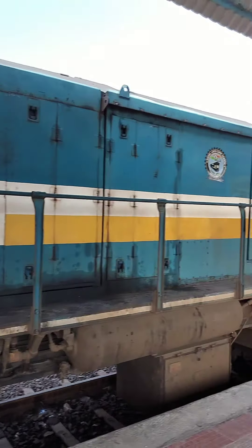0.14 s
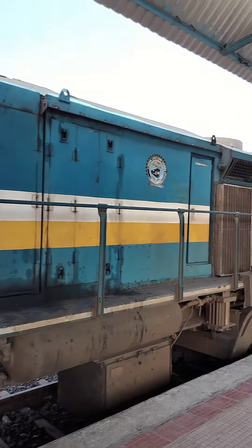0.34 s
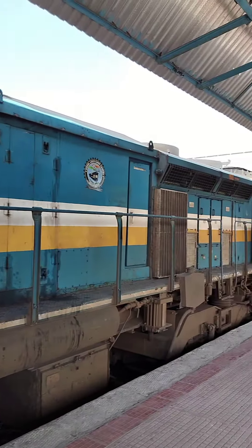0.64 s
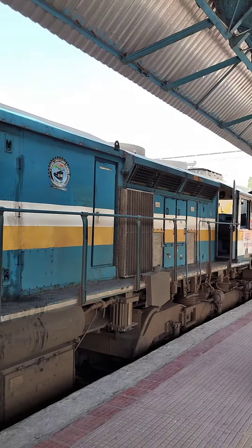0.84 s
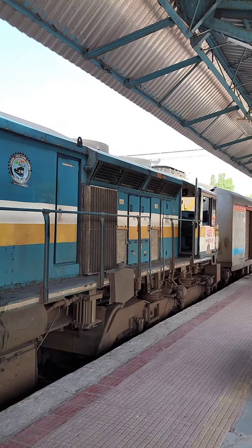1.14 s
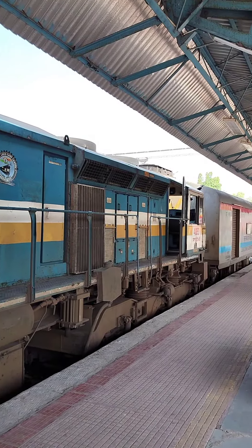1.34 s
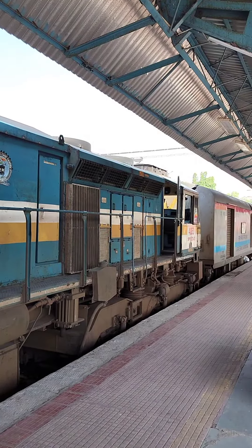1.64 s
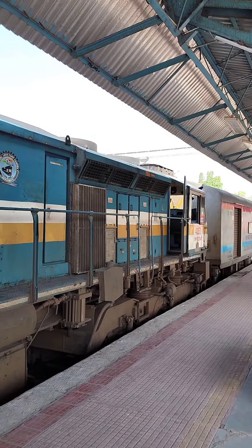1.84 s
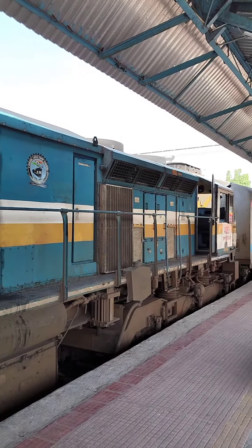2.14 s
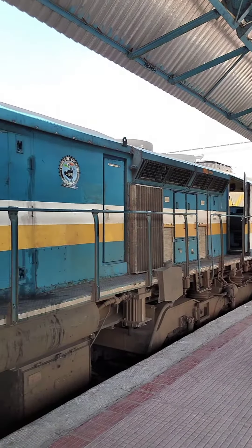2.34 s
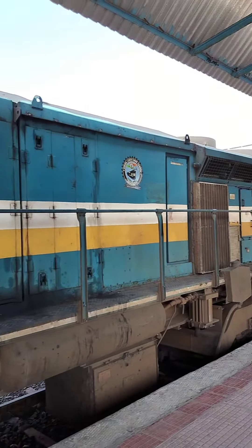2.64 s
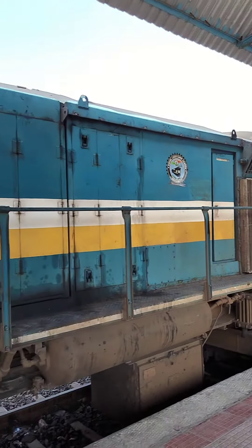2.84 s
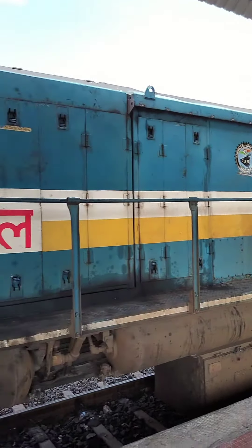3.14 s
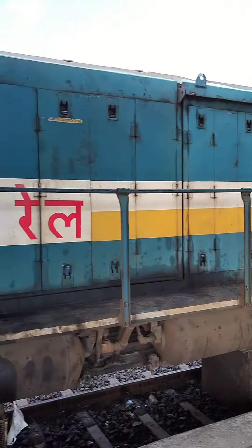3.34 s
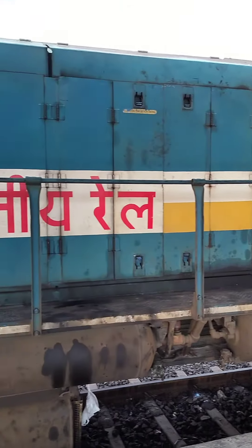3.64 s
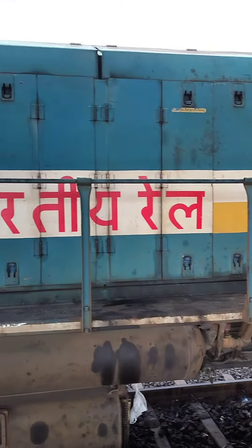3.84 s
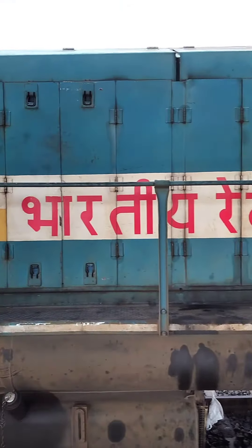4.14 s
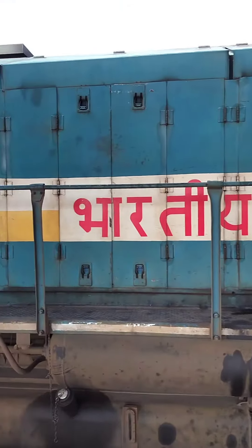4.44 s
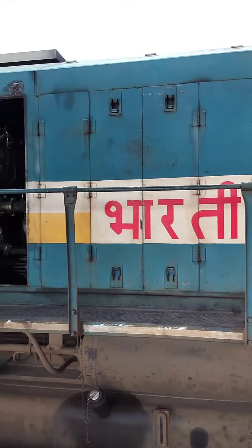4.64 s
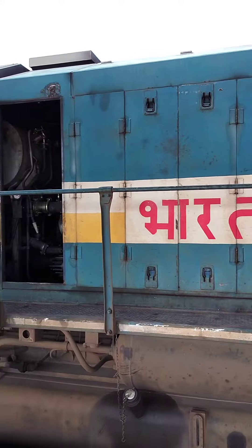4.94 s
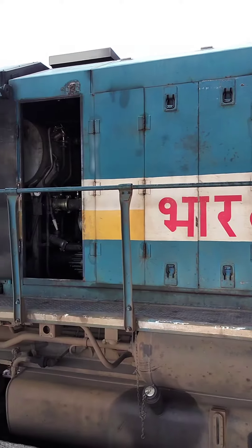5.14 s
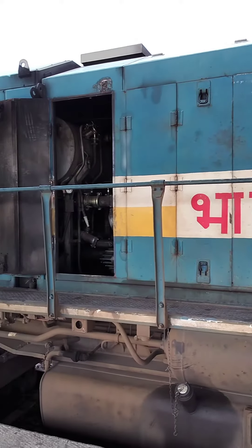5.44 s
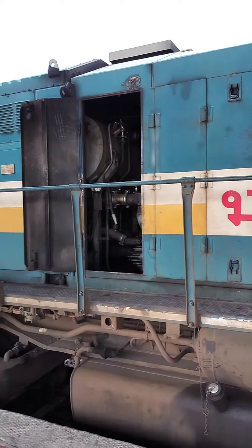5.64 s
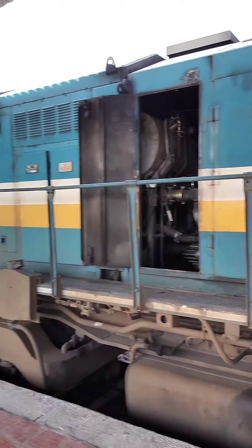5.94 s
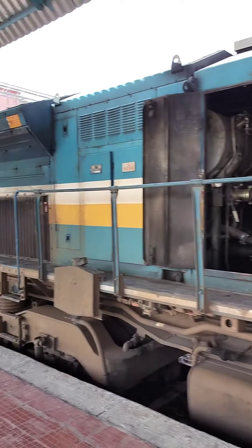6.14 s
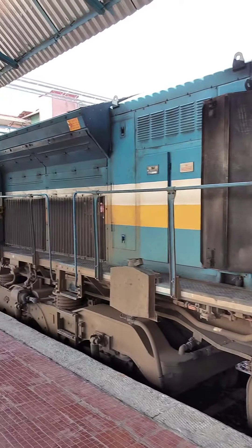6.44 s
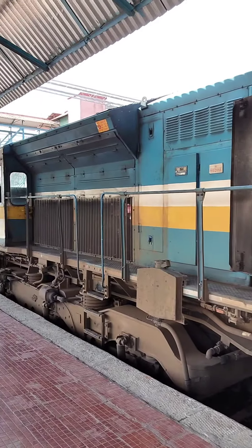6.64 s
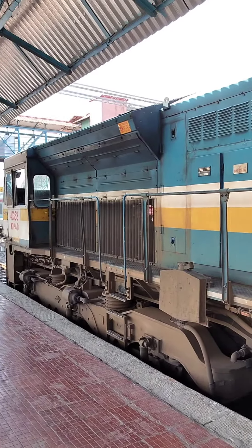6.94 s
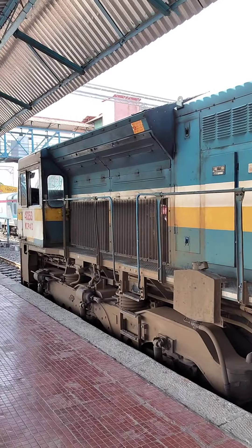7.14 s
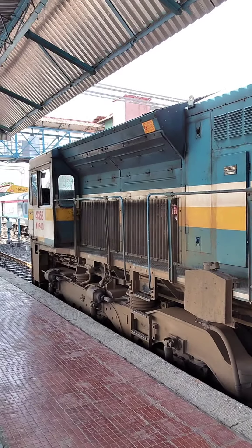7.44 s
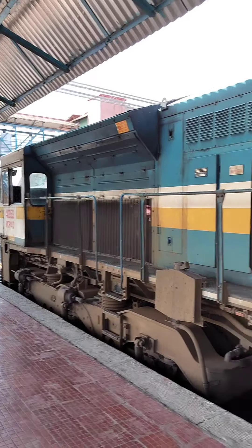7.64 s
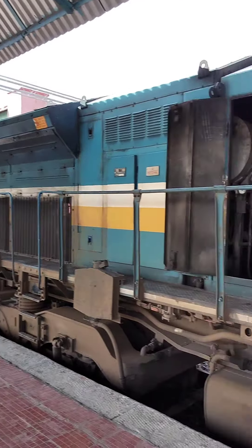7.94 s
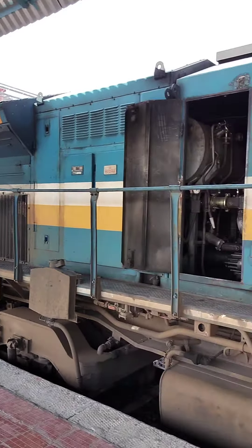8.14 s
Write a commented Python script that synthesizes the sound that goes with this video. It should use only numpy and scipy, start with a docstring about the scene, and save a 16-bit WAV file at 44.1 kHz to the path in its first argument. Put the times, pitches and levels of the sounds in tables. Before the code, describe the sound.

Close, steady locomotive diesel: a low pulsing drone, rattling valve gear, rushing cooling air and gear and turbocharger whines that swell and fade.

```python
"""Locomotive diesel heard along its hood

A big two-stroke diesel runs at steady speed beside a platform while a pair of microphones pans along its hood.
Eight exhaust beats a crank turn, with neighbouring orders against them, make a deep throbbing hum with chugs.
Valve gear and a loose panel repeat their clatter every turn; gear teeth whine at multiples of the crank rate.
The turbocharger and blowers sing, swelling and fading, over the noise of the cooling air and one faint spit.
"""
import sys
import numpy as np
from scipy import signal
from scipy.fft import irfft
from scipy.io import wavfile
from scipy.ndimage import uniform_filter1d

SR = 44100
rng = np.random.default_rng(int(sys.argv[2]) if len(sys.argv) > 2 else 0)


def generate_wav(sig):
    """Save sig (samples, or channels by samples) to the path in sys.argv[1] as 16-bit PCM at SR."""
    pcm = np.round(np.clip(np.atleast_2d(sig).T, -1, 1) * 32767).astype(np.int16)
    wavfile.write(sys.argv[1], SR, pcm)


N = 365148
TIME = np.arange(N) / SR  # s
CRANK_HZ = 9.4898
BEATS = 8  # exhaust beats per crank turn


def undb(db):
    """A level in decibels is twenty times the logarithm of the amplitude gain."""
    return 10 ** (np.asarray(db) / 20)


def curves(table, along=TIME):
    """Linear interpolation reads each column of a table along time or another control."""
    points, *columns = np.transpose(table)
    return [np.interp(along, points, column) for column in columns]


def at(table, hz):
    """Spectra are interpolated on a logarithmic frequency axis."""
    f, value = np.transpose(table)
    return np.interp(np.log(hz + 1e-3), np.log(f), value)


def walk(rate):
    """Held random values, smoothed by two moving averages, wander slowly with a spread near 1."""
    k = int(SR / rate)
    held = np.repeat(rng.standard_normal(N // k + 2), k)[rng.integers(k):]
    smooth = uniform_filter1d(uniform_filter1d(held, k), k)
    return 1.5 * smooth[:N]


def pair(hz):
    """Spatial coherence: left and right spectra of unit power, alike in the bass, nearly unrelated in the high treble."""
    # likeness of the two microphones: (frequency [Hz], correlation [-1 to 1])
    likeness = [(70, .97), (150, .97), (280, 0.8), (450, 0.68), (700, 0.37), (1200, -0.37), (2000, 0.14),
                (4000, -0.018)]
    real, imaginary = rng.standard_normal((2, len(hz))), rng.standard_normal((2, len(hz)))
    mid, side = (real + 1j * imaginary) / 2
    like = np.clip(at(likeness, hz), -1, 1)
    return mid * np.sqrt(1 + like) + side * np.sqrt(1 - like) * np.array([[1], [-1]])


def band(hz, width_hz):
    """Resonance: noise through a squared band-pass response, scaled to unit rms."""
    f = np.fft.rfftfreq(N, 1 / SR) + 1e-3
    response = 1 / (1 + 1j * (f - hz ** 2 / f) / width_hz) ** 2
    y = irfft(pair(f) * response, N)
    return y / y.std()


def fading_tone(phase, rate, scatter):
    """Multipath fading: a tone, a quarter cycle apart at the microphones, plus shifting roof and platform reflections."""
    echoes = np.array([walk(rate) + 1j * walk(rate) for _ in range(2)])
    direct = np.array([[1], [1j]])
    tone = np.imag((direct + scatter * echoes) * np.exp(1j * phase))
    return tone / np.sqrt(.5 + scatter ** 2)


def swells(table, crank, rear, scatter_db, lag_s):
    """Periodic excitation: resonances swell at fixed points of every turn, their cycles later at the left microphone."""
    out = 0
    for share, length, hz, front_db, rear_db in table:
        turns = (crank / (2 * np.pi) - share + .5) % 1 - .5  # signed distance from the peak
        swing = np.cos(2 * np.pi * hz * (turns / CRANK_HZ - np.array([[lag_s], [0]])))
        db = front_db + (rear_db - front_db) * rear + scatter_db * walk(11)
        out = out + undb(db) * np.exp(-(turns / length) ** 2) * swing
    return out


def air(crank, rear):
    """Turbulence: broadband fan and intake noise, louder by the radiators, pulses with the exhaust beats."""
    # spectrum of the rush before its swell and pulse: (frequency [Hz], spectral density [dB per Hz])
    rush_spectrum = [(25, -64.5), (65, -60.5), (150, -55.5), (280, -60), (400, -58.5), (530, -63),
                     (700, -58.5), (900, -60.5), (1250, -59), (1650, -60.5), (2000, -59.3), (2600, -63.8),
                     (3200, -67.2), (4500, -66), (5100, -70.3), (6500, -71), (9900, -89), (12300, -83.3),
                     (15500, -90.5)]
    swell_db, flicker_db, pulse = 1.4, .45, .062
    hz = np.fft.rfftfreq(N, 1 / SR)
    rush = irfft(pair(hz) * undb(at(rush_spectrum, hz)), N) * np.sqrt(N * SR / 2)
    beating = 1 + pulse * np.sin(BEATS * crank)
    return rush * beating * undb(swell_db * rear ** 2 + flicker_db * walk(14))


def blowers():
    """Multipath fading: steady fan, blower and auxiliary tones swell and fade; the shrillest beams to the left."""
    # tone levels, before the shading of the shrill tone: (time [s], level [dB rms])
    fan_level = [(0, -53), (.9, -41), (2.5, -44), (3.15, -57), (3.6, -46), (5, -48), (6.7, -42),
                 (8.28, -44)]
    blower_level = [(0, -47), (.3, -52), (.6, -43), (1.05, -44), (1.5, -54), (1.7, -41.5), (2.2, -42),
                    (2.35, -51), (2.85, -54), (3.05, -42), (3.4, -41), (3.6, -53), (4.9, -50), (5.4, -52),
                    (5.6, -46), (6.6, -41), (7.5, -45), (7.7, -52), (8.28, -50)]
    shrill_level = [(0, -57), (1.6, -53), (2, -58), (3, -51), (3.6, -55), (6.2, -56), (7.1, -49),
                    (7.8, -54), (8.15, -46), (8.28, -48)]
    # faint steady auxiliaries: (frequency [Hz], level [dB rms])
    auxiliaries = [(3456, -54), (3857, -52), (4502.5, -46)]
    shade_db = -8  # shrill tone at the right microphone

    def sing(hz, db, rate, scatter):
        """Superposition of one tone and its reflections at a given level."""
        return undb(db) * fading_tone(2 * np.pi * hz * TIME, rate, scatter)

    fan = sing(1047, curves(fan_level)[0], 5, .2)
    blower = sing(5389, curves(blower_level)[0], 6, .22)
    shrill = sing(9109.5, curves(shrill_level)[0], 11, .65)
    rest = sum(sing(hz, db, 6, .6) for hz, db in auxiliaries)
    return fan + blower + shrill * undb([[0], [shade_db]]) + rest


def spit():
    """Jet noise: a valve lets out compressed air as a thin, short hiss."""
    # the puff: (time of its peak [s], half-length [s], peak level [dB rms])
    puff = (4.7, .04, -53)
    peak_s, length_s, db = puff
    return undb(db) * np.exp(-((TIME - peak_s) / length_s) ** 2) * band(12800, 5000)


def clatter(crank, rear):
    """Line spectrum: noise gathered at crank orders nearly repeats each turn; wider high lines change sooner."""
    # valve gear through the hood, before the beat: (frequency [Hz], front [dB per order], rear [dB per order])
    valve_spectrum = [(109, -36, -30), (138, -50, -45), (177, -39.5, -45.5), (198, -53, -40.5),
                      (231, -43.5, -38.5), (260, -60, -51), (300, -62, -47), (358, -45.5, -55),
                      (387, -48.5, -47), (406, -50.5, -45.5), (473, -43.5, -44), (490, -57, -53.5),
                      (572, -51.5, -46), (616, -43.5, -43.5), (655, -47.5, -41.5), (672, -40, -36),
                      (715, -38, -43), (785, -46.5, -48), (800, -51, -53.5), (910, -51.5, -54.5),
                      (1110, -50.5, -60.5), (1180, -45, -47.5), (1700, -56.5, -60.5), (1800, -52, -57.5),
                      (2300, -55, -59), (2630, -62, -56), (3380, -73, -62), (4830, -62, -72)]
    # smear of each order by the passage through standing waves, as a share of its frequency
    smear, least_smear_hz = .00038, .09
    beat = .093  # depth of the swell in step with the firings
    hz = np.fft.rfftfreq(N, 1 / SR)
    order = np.rint(hz / CRANK_HZ).astype(int)
    width_hz = np.maximum(smear * hz, least_smear_hz)
    lines = pair(hz) * np.exp(-((hz - order * CRANK_HZ) / width_hz) ** 2)
    # every order is brought to equal power before the spectrum shapes it
    order_power = np.bincount(order, np.mean(abs(lines) ** 2, axis=0))
    lines = lines / np.sqrt(order_power)[order]
    f, front_db, rear_db = np.transpose(valve_spectrum)
    inside = (hz > f[0]) * (hz < f[-1])

    def heard(db):
        """Spectral shaping turns the lines into the clatter heard from one end."""
        return irfft(lines * undb(at(np.c_[f, db], hz)) * inside, N) * N / np.sqrt(2)

    front, back = heard(front_db), heard(rear_db)
    # the valves close in step with the firings
    return (front + (back - front) * rear) * (1 + beat * np.cos(BEATS * crank))


def panel(crank, rear):
    """Forced vibration: firing shocks buzz a hood panel twice a turn, one buzz stronger in front, one at the rear."""
    # buzzes: (place [share of turn], half-length [turns], resonance [Hz], front peak [dB], rear peak [dB]),
    # peaks as heard at the right microphone
    buzz_table = [(.55, .12, 690, -28, -36), (.92, .16, 692, -38, -24)]
    left_db = -2
    return swells(buzz_table, crank, rear, scatter_db=1.5, lag_s=.00016) * undb([[left_db], [0]])


def turbo(crank):
    """Interference: a pure whine flutters against its echoes; a beat-shaken, breathy whistle beams to the left."""
    # whine across the standing waves, before its trim: (time [s], left [dB rms], right [dB rms], left lead [rad])
    whine_path = [(0, -35, -33, 0), (.2, -33, -37, 1.2), (.28, -39, -44, 1.4), (.46, -29, -35, 2.6),
                  (.7, -45, -35, 2), (1, -38, -40, 2.7), (1.26, -32, -42, 2.2), (1.6, -29, -39, .9),
                  (1.88, -32, -39, 0), (2.2, -43, -43, .5), (2.42, -35, -39, .7), (2.64, -43, -42, 2.2),
                  (2.95, -36, -42, 1.8), (3.17, -31, -28, .3), (3.4, -46, -29.5, -2.3),
                  (3.69, -30, -38, -.8), (3.9, -45, -46, -3), (4.12, -39, -28.5, -2), (4.4, -40, -43, -3.1),
                  (4.64, -31, -39, -4.9), (5, -29.5, -35, -7), (5.2, -43, -38, -6.6), (5.4, -35, -34, -5.8),
                  (5.6, -40, -37, -7.2), (5.75, -34, -36, -6.8), (6.02, -34, -33, -6.6),
                  (6.2, -39, -38, -8.7), (6.42, -37, -34, -6.7), (6.8, -32, -43, -8.3),
                  (7.55, -30, -44, -9.2), (7.7, -33, -37, -8.9), (7.88, -33, -29, -6.6),
                  (8.28, -46, -43, -8.6)]
    # whistle before its trim: (time [s], level [dB rms])
    whistle_level = [(0.0, -31.5), (0.11, -45), (1.08, -43), (1.31, -32), (1.43, -43), (2.4, -37.5),
                     (4.82, -43.5), (4.98, -33), (5.05, -41.5), (6.64, -37), (7.17, -43), (7.24, -31.5),
                     (7.61, -45), (8.28, -40)]
    whine_hz, whine_trim_db, whine_flutter_db, echo_db = 4607.5, -.8, 1.6, -47
    whistle_hz, whistle_trim_db, whistle_flutter_db = 8399.5, 1.5, 1.2
    hiss_db, shade_db = -37, -13  # shade: whistle and hiss at the right microphone

    left, right, lead = curves(whine_path)
    spin = 2 * np.pi * whine_hz * TIME + walk(3)
    direct = np.sqrt(2) * undb([left, right]) * np.sin(spin + np.array([lead, -lead]) / 2)
    echoes = fading_tone(spin, 14, 3)
    whine = undb(whine_trim_db + whine_flutter_db * walk(14)) * direct + undb(echo_db) * echoes

    # the exhaust beats modulate the whistle's phase
    whistle_phase = 2 * np.pi * whistle_hz * TIME + .5 * np.sin(BEATS * crank) + walk(8)
    shaken = fading_tone(whistle_phase, 45, .5)
    whistle_db = curves(whistle_level)[0] + whistle_trim_db + whistle_flutter_db * walk(6.7)
    breathy = undb(whistle_db) * shaken + undb(hiss_db) * band(whistle_hz, 460)
    return whine + breathy * undb([[0], [shade_db]])


def gears(crank, heading, rear):
    """Tooth meshing: tones at multiples of the crank rate, phase-modulated by shaft twist, with directional lobes."""
    # lobes: (heading [degrees], drive left [dB rms], drive right [dB rms], drive left lead [rad],
    # pump left [dB rms], pump right [dB rms], drive third harmonic before left trim [dB rms])
    lobes = [(-66, -30, -26.5, -1.5, -42, -39, -41), (-51, -33.5, -24, -1.9, -35, -43, -33.5),
             (-33, -23, -24, -3.3, -41, -38, -38), (-19, -18, -35, -4, -39, -45, -44),
             (-6, -17.3, -29, -5.7, -33, -40, -43), (7, -19.7, -27.5, -5.6, -36, -37, -42),
             (20, -30, -27, -3.3, -49, -46, -45), (32.5, -27, -23, -.8, -42, -32, -45),
             (47, -25, -21, -.3, -35, -26, -45), (79, -30, -20.7, -.9, -36, -29, -48)]
    # second harmonic of the drive gear, before load and left trim: (time [s], level [dB rms], pulsing depth [0-1])
    pips = [(0, -30.5, 1), (.35, -31.5, 1), (.6, -34, .95), (.9, -35.5, .4), (2.2, -34.5, .5),
            (2.65, -36.5, .5), (3.15, -28.5, .35), (3.6, -38, .4), (5.5, -41, .5), (6.6, -40, .7),
            (8.28, -40, .7)]
    # idler before its load: (teeth [count], facing flank [dB rms], facing away [dB rms],
    # lobe heading [degrees], lobe width [degrees])
    idler_lobe = (72, -32.5, -47, 5, 25)
    # weaker mesh tones: (order [multiple of crank rate], front [dB rms], rear [dB rms])
    mesh_tones = [(34, -40, -58), (41, -38.5, -38), (199, -50, -54), (207, -52, -46), (226, -45, -46),
                  (234, -54, -46), (284, -53, -50), (316, -52, -52), (395, -54, -53)]
    drive_teeth, pump_teeth = 79, 113
    runout, jitter = .1, .071  # twist within a turn and random twist (radians of tooth phase)
    left_db = -5  # trim of the drive overtones

    drive_l, drive_r, lead, pump_l, pump_r, third_db = curves(lobes, heading)
    second_db, depth = curves(pips)
    twist = runout * np.sin(crank) + jitter * walk(30)
    teeth = drive_teeth * crank + twist
    ports = np.array([[0], [1]])  # phase step between the microphones (radians)
    drive = undb([drive_l, drive_r]) * np.sin(teeth + np.array([lead, -lead]) / 2)
    pump = undb([pump_l, pump_r]) * np.sin(pump_teeth * crank + twist + ports / 2)

    # the idler, loaded just after mid-turn, is heard best nearly square to the engine's flank
    count, flank_db, away_db, facing_deg, width_deg = idler_lobe
    facing = np.exp(-((heading - facing_deg) / width_deg) ** 2)
    idler = undb(away_db + (flank_db - away_db) * facing) * np.sin(count * crank + twist + ports / 2)
    idler = idler * (1 - .7 * np.cos(crank - .9))

    # the teeth press hardest once a turn, so the second harmonic comes in pips
    load = 1 + depth * np.cos(crank - .9)
    second = load * undb(second_db + 1.6 * walk(13)) * np.sin(2 * teeth + ports)
    third = undb(third_db) * np.sin(3 * teeth + ports / 2)
    overtones = (second + third) * undb([[left_db], [0]])

    mesh = 0
    for k, front_db, back_db in mesh_tones:
        tone = fading_tone(round(k) * crank + 2 * twist, 1.205, .68)
        mesh = mesh + undb(front_db + (back_db - front_db) * rear) * tone
    return np.sqrt(2) * (drive + pump + idler + overtones) + mesh


def chugs(crank, rear):
    """Resonance under pulsed flow: uneven gas slugs swell the resonances of the exhaust."""
    # chugs before the exhaust pan:
    # (place [share of turn], half-length [turns], resonance [Hz], front peak [dB], rear peak [dB])
    chug_table = [(.1, .14, 132, -30.5, -24.5), (.54, .19, 145, -22.3, -24.5), (.79, .07, 126, -26, -25),
                  (.24, .2, 216, -29.5, -26), (.5, .08, 208, -33, -28), (.76, .07, 208, -35, -28),
                  (.95, .1, 230, -25, -24.5), (.99, .07, 392, -22.5, -26.5)]
    return swells(chug_table, crank, rear, scatter_db=.5, lag_s=.00024)


def exhaust(crank, rear):
    """Beating of harmonics: orders beside the eight beats a turn oppose them once a turn, so the hum throbs."""
    # opposing orders: (order [multiple of crank rate], level relative to the beat [dB])
    throb = [(5, -36), (6, -29), (7, -25), (9, -7), (10, -12.5), (11, -18), (12, -22)]
    # level of the beat order in front, its gain to the rear and its waver, before flow and pan
    hum_db, hum_rear_db, waver_db = -18.5, 1.8, .02
    pause, sag = .2, .055  # depths of the once-a-turn flow changes
    pan_db = -.5  # left over right
    hum = np.sin(BEATS * crank) - sum(undb(db) * np.sin(k * crank) for k, db in throb)
    hum = hum * undb(hum_db + hum_rear_db * rear + waver_db * walk(10))
    # the flow slackens in the pause between groups of beats; the hum is strongest after it
    slack = np.cos(crank / 2) ** 12
    flow = (1 - pause * slack) * (1 + sag * np.sin(crank))
    return (np.sqrt(2) * flow * hum + chugs(crank, rear)) * undb(np.array([[pan_db], [-pan_db]]) / 2)


def scene():
    """Superposition: one almost perfectly steady crank phase drives the engine sounds; heading sets the mix."""
    # the microphones pan to and fro: (time [s], heading [degrees; 0 faces the hood, positive its front])
    heading_path = [(0, 20.5), (.4, 45), (1.55, 104), (2.5, 56.5), (4.3, -7), (5.7, -32.5), (6.5, -60.5),
                    (7.35, -77), (8.28, -45)]
    # headings at which only the front, or only the open engine door and radiators, are heard
    front_deg, rear_deg = 72, -50
    front_pan_db, rear_pan_db = -2.5, -.8  # left over right, for the hood sounds
    crank = 2 * np.pi * CRANK_HZ * TIME + .0011 * walk(2.99)
    heading = curves(heading_path)[0]
    rear = np.clip((front_deg - heading) / (front_deg - rear_deg), 0, 1)
    pan_db = front_pan_db + (rear_pan_db - front_pan_db) * rear
    hood = air(crank, rear) + blowers() + clatter(crank, rear)
    hood = hood * undb(np.array([pan_db, -pan_db]) / 2)
    machinery = panel(crank, rear) + turbo(crank) + gears(crank, heading, rear)
    return hood + spit() + machinery + exhaust(crank, rear)


def record(dry):
    """Band limiting: a steep elliptic low-pass removes the sound above 15650 Hz."""
    low_pass = signal.ellip(10, .1, 80, 15650, fs=SR, output="sos")
    return signal.sosfilt(low_pass, dry)


dry = scene()
out = record(dry)
generate_wav(out)
```